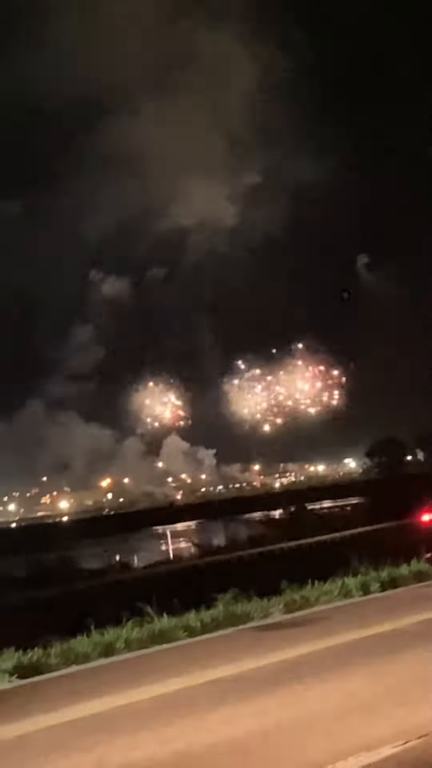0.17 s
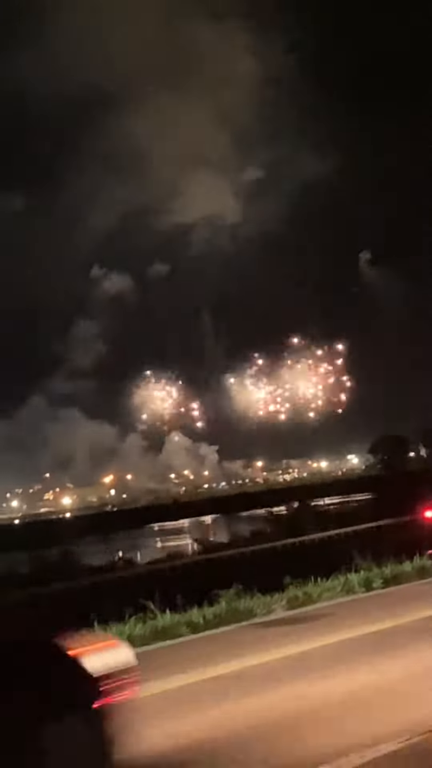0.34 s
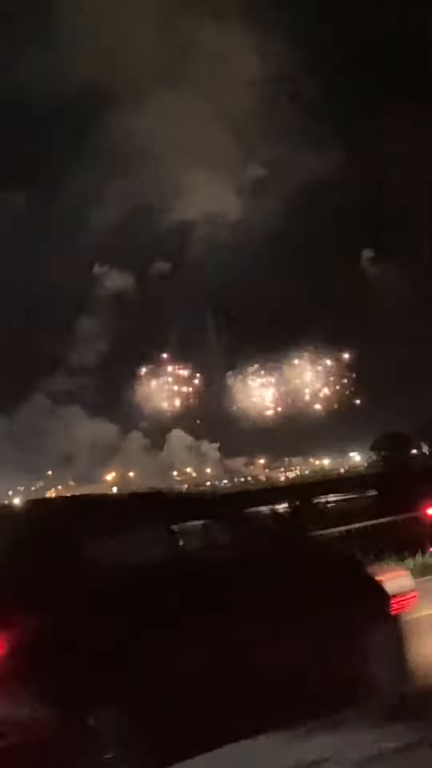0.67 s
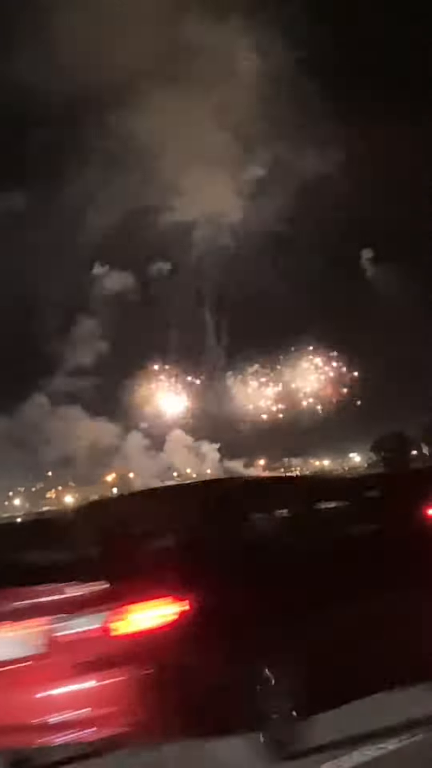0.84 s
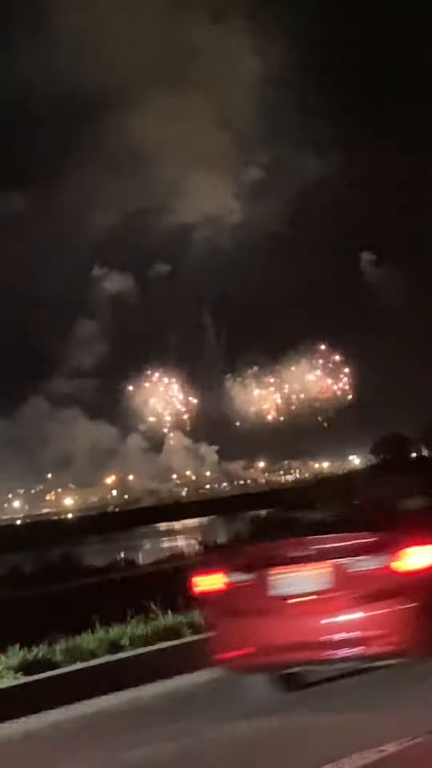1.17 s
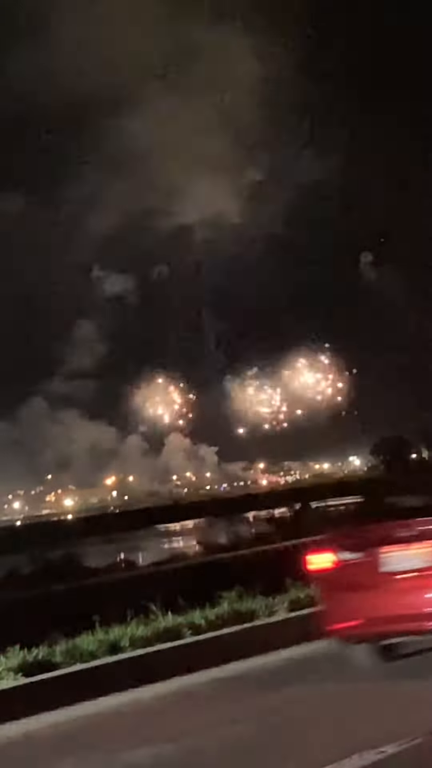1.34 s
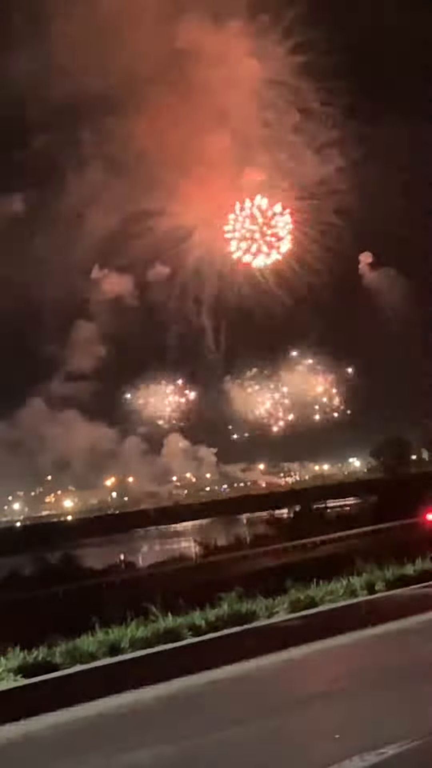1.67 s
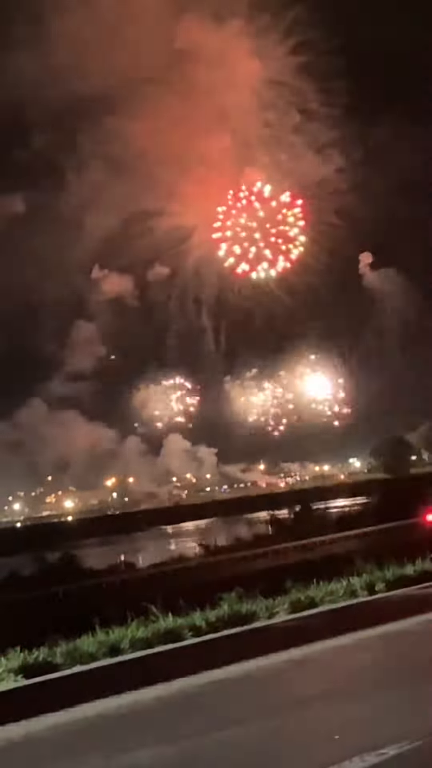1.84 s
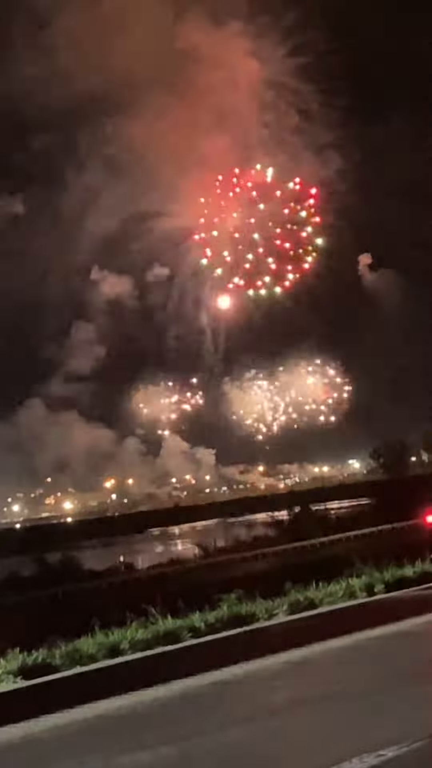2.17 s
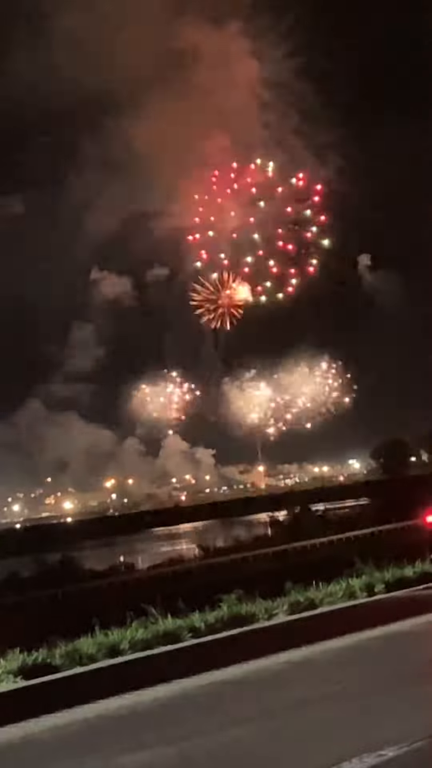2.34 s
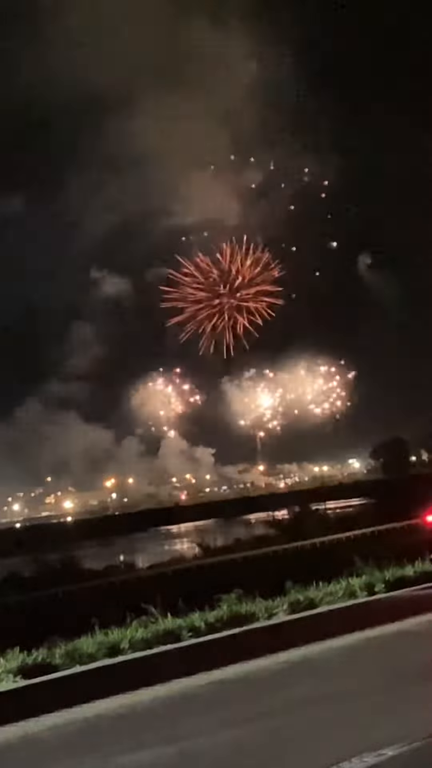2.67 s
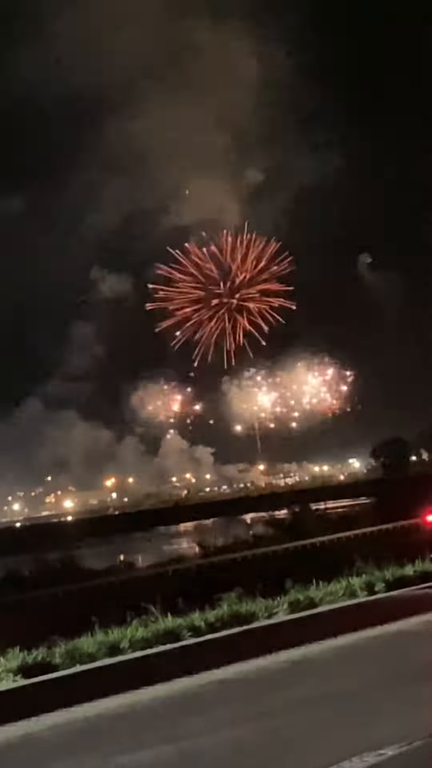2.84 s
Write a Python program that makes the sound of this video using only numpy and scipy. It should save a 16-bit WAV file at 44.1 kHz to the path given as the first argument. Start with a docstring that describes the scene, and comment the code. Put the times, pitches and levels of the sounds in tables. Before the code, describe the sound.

Fireworks bang far off across water from start to finish, about ten uneven bursts a second, each with a short echo and a quick downward bend in pitch. Small faint pops, rolling rumble and road noise run underneath. A departing car's faint tyre hiss fades over the three seconds. Stronger bangs land around 1.2 and 2.4 seconds, and a heavy shell adds a deep thump just before 2.5 seconds.

```python
"""Fireworks bursting far off over water at night, heard on a phone at a roadside.
Each burst is a sharp pulse of air that arrives twice: straight, then bounced off the water.
One heavy shell adds a deep thump, and the banks echo. Behind them are small far pops, rolling rumble,
road noise and the tyre hiss of a car drawing away. The phone lets the bass arrive late, so each
bang becomes a falling chirp, and its right microphone opening hears more than its left."""
import sys
import numpy as np
from scipy import signal
from scipy.fft import rfft, irfft, next_fast_len
from scipy.io import wavfile
from scipy.ndimage import uniform_filter1d, minimum_filter1d

SR = 44100
rng = np.random.default_rng(int(sys.argv[2]) if len(sys.argv) > 2 else 0)


def materialize(psi):
    """Save the field psi as 16-bit PCM at rate SR to the path in sys.argv[1].

    A 1-D psi becomes a single channel; in a 2-D psi each row is a channel.
    """
    bounded = np.clip(np.atleast_2d(psi).T, -1, 1)
    quanta = np.round(bounded * 32767).astype(np.int16)
    wavfile.write(sys.argv[1], SR, quanta)


N = 132300  # 3 seconds


def amp(db):
    """Turn decibels into a number to multiply by."""
    return 10 ** (np.asarray(db) / 20)


def unit_level(x):
    """Scale a signal so that its typical size (RMS) is 1."""
    return x / np.sqrt(np.mean(x ** 2) + 1e-20)


def curve_at(points, hz):
    """Read a table between its rows, on a pitch-like (log) frequency scale."""
    row_hz, value = np.transpose(points)
    return np.interp(np.log(hz + 1), np.log(row_hz + 1), value)


def add(mix, start_s, sound):
    """Mix a sound in, dropping whatever sticks out at either end."""
    at = round(start_s * SR)
    sound = sound[max(-at, 0):]
    part = mix[max(at, 0):][:len(sound)]
    part += sound[:len(part)]


# The tone of the rumble and road noise. Each row: frequency in Hz, level in dB.
RUMBLE_TONE = [(30, -75), (50, -53.5), (90, -47.5), (200, -53), (450, -54), (650, -60), (1000, -60.5),
               (1500, -64.5), (2200, -71.5), (3300, -80.5), (4700, -91.5), (6100, -104), (8000, -120)]
# How it rolls. Each row: time in seconds, then bass, middle, treble and top in dB.
# Only the rise and fall around each column's average counts.
RUMBLE_ROLL = [(0.0, -29.5, -34.5, -36.5, -56.5), (0.39, -39, -33, -38, -57), (0.56, -37, -37, -35.5, -60),
               (0.81, -34.5, -34.5, -40, -61), (1.14, -36.5, -38.5, -38, -62.5),
               (1.489, -35, -36, -36, -62), (2.21, -35.5, -39, -35.5, -63.5),
               (2.41, -35.5, -40, -35.5, -68), (2.7, -38.5, -33.5, -33.5, -62),
               (3.0, -31.5, -39, -37.5, -63.5)]
# Tyre hiss fading as a car draws away. Each row: time in seconds, level in dB.
TYRE_FADE = [(0.0, -93.5), (0.34, -99), (0.7, -100.5), (0.85, -102), (1.02, -103.5), (1.8, -107.5),
             (2.3, -111), (2.71, -113.5), (3.0, -115)]
# The tone of that hiss. Each row: frequency in Hz, boost in dB.
TYRE_TONE = [(3500, -10), (5000, 8), (6300, 8), (7300, 7), (10000, -0.8), (12500, -3.5), (14000, -5.5),
             (15500, -13)]
# How alike the noise is left and right. Each row: frequency in Hz, likeness from 0 to 1.
SIDE_LIKENESS = [(100, 1), (400, 0.8), (1000, 0.88), (2200, 0.98), (5000, 1), (7300, .98), (9000, 0.97),
                 (10500, 0.96), (14500, 0.88), (15500, .9)]


def rumble_and_road():
    """Rolling rumble, road noise and tyre hiss in stereo, built from short slices of shaped noise."""
    frames, hz = N // 256 + 5, np.fft.rfftfreq(1024, 1 / SR)
    t = np.arange(frames) * 256 / SR
    right_re, right_im, other_re, other_im, patches = rng.standard_normal((frames, 513, 5)).T
    # Patches of pitch waver by about 1.5 dB, and the whole rumble swells by about 1 dB.
    patches = uniform_filter1d(patches, size=10, axis=0)
    patch_db = 1.5 * unit_level(uniform_filter1d(patches, size=8, axis=1))
    swell_db = 1.14 * unit_level(uniform_filter1d(rng.standard_normal(frames), size=6))
    times, *bands = np.transpose(RUMBLE_ROLL)
    roll_db = np.array([np.interp(t, times, band - band.mean()) for band in bands])
    band_hz = (110, 450, 1500, 5300)  # bass, middle, treble, top
    blend = np.array([curve_at(list(zip(band_hz, one_band)), hz) for one_band in np.eye(4)])
    rumble = amp(curve_at(RUMBLE_TONE, hz)[:, None] + blend.T @ roll_db + patch_db + swell_db)
    hiss = amp(curve_at(TYRE_TONE, hz)[:, None] + np.interp(t, *np.transpose(TYRE_FADE)))
    alike = curve_at(SIDE_LIKENESS, hz)[:, None]
    right = right_re + 1j * right_im
    left = alike * right + np.sqrt(1 - alike ** 2) * (other_re + 1j * other_im)
    slices = np.array([left, right]) * np.hypot(rumble, hiss)
    return 6.72 * signal.istft(slices, nperseg=1024, noverlap=768)[1][:, :N]


# The tone of one bang. Each row: frequency in Hz, relative level in dB.
BANG_TONE = [(25, -40.5), (45, -14), (90, -6.5), (130, -4), (300, 2.5), (450, 0), (600, -5.5), (750, -15),
             (1000, -11.5), (1500, -22), (2200, -30.5), (3300, -36.5), (4700, -49), (6000, -59),
             (7500, -57), (10000, -82.5), (13000, -83.5), (15500, -94)]
# Five tone controls for a bang. Each row: frequency in Hz, share of the boost from 0 to 1.
KNOCK_BAND = [(550, 0), (850, 1), (1250, 1), (1800, 0)]  # around 1000 Hz
TREBLE_BAND = [(1250, 0), (1800, 1)]  # from about 1500 Hz up
BOOM_BAND = [(170, 1), (260, 0)]  # the bass
HOLLOW_BAND = [(550, 0), (750, 1), (950, 0)]  # around 750 Hz
SNAP_BAND = [(2400, 0), (3800, 1)]  # from about 3000 Hz up
BANG_LEAD = 2048  # samples that come before the pulse itself
SMEAR_DB, SMEAR_HZ, SMEAR_FADE_MS = -6, 930, 1.66


def bang(db, knock_db=0, treble_db=0, boom_db=0, hollow_db=0, snap_db=0, low_cut_hz=0.75):
    """One pulse of air pressure. Rough air and ground smear it, the treble most."""
    size = 2 * BANG_LEAD
    hz, t = np.fft.rfftfreq(size, 1 / SR), np.arange(size) / SR
    tone = amp(curve_at(BANG_TONE, hz))
    controls = [(knock_db, KNOCK_BAND), (treble_db, TREBLE_BAND), (boom_db, BOOM_BAND),
                (hollow_db, HOLLOW_BAND), (snap_db, SNAP_BAND)]
    boost = amp(sum(boost_db * curve_at(band, hz) for boost_db, band in controls))
    smear = rng.standard_normal(size) * np.exp(-1000 * t / SMEAR_FADE_MS) * (t > 0)
    share = amp(SMEAR_DB) * np.minimum(hz / SMEAR_HZ, 3)
    rough_path = (1 + share * rfft(smear / np.linalg.norm(smear))) / np.sqrt(1 + share ** 2)
    steep_front = np.exp(-0.5j)  # shifting every wave by half a radian steepens the front
    low_cut = 1 / (1 + (low_cut_hz / (hz + 1)) ** 4)
    pulse = irfft(tone * boost * rough_path * steep_front * low_cut)
    plain_peak = irfft(tone)[0]
    return amp(db + 2) * np.roll(pulse, BANG_LEAD) / plain_peak  # every bang is lifted by 2 dB


def far_pops(per_second=130, quietest_db=-34.5):
    """Small far bangs at random moments, most of them faint."""
    extra_db = 6 * np.minimum(rng.exponential(1, N), 3)
    hits = amp(quietest_db + extra_db) * (rng.random(N) < per_second / SR)
    return signal.oaconvolve(hits, bang(0))[BANG_LEAD:N + BANG_LEAD]


def bank_echoes(shells, level_db=-17.5, fade_s=0.09):
    """Echoes off the banks: three thin, dying trails of reflections take turns."""
    t, out = np.arange(SR // 4) / SR, 0
    cycle = 2 * np.pi * 3 * np.arange(N) / SR
    for k in range(3):
        reflections = rng.standard_normal(len(t)) * (rng.random(len(t)) < 1500 / SR)
        trail = reflections * amp(-60 * t / fade_s) * (t > .004)
        turn = np.sqrt(2 / 3) * np.cos(cycle + k * np.pi / 3)
        out = out + signal.oaconvolve(shells * turn, trail / np.linalg.norm(trail))[:N]
    return amp(level_db) * out


# The heavy shell's cracks. Each row: start in seconds, then relative level, knock and treble in dB.
HEAVY_CRACKS = [(2.4512, -2, -4, -22), (2.4561, 4.5, -3.5, -8.5)]
THUMP_START_S, THUMP_HZ, THUMP_DB, THUMP_RISE_S, THUMP_FADE_S = 2.4387, 80, -2.5, .018, .06


def heavy_shell():
    """Two thin cracks on top of a deep swing of air that quickly dies away."""
    out, t = np.zeros(N), np.arange(0, .2, 1 / SR)
    for start_s, db, knock_db, treble_db in HEAVY_CRACKS:
        add(out, start_s - BANG_LEAD / SR, bang(db, knock_db, treble_db, low_cut_hz=337))
    rise = np.sin(np.pi / 2 * np.minimum(t / THUMP_RISE_S, 1)) ** 2
    fade = amp(-60 * np.maximum(t - THUMP_RISE_S, 0) / THUMP_FADE_S)
    swing = np.cos(2 * np.pi * THUMP_HZ * (t - THUMP_RISE_S))
    add(out, THUMP_START_S, amp(THUMP_DB) * rise * fade * swing)
    return out


# The bursting shells. Each row: start in seconds, then relative level, knock and treble in dB;
# the bounce's delay in milliseconds, its level against the straight sound, its knock and treble in dB;
# and last, boom, hollow and snap in dB, which both arrivals share.
SHELL_BURSTS = [(0.0164, 1.5, -14, 0.5, 6.87, 1.5, 3, 4, -1.5, 4, 1.3),
                (0.1736, 2.5, 2, 2, 7.06, 1, 1, -8, 0.3, -2.5, 1.5),
                (0.2094, -1.5, 7, 15.5, 7.6, 5.5, -1.5, 1, -2, -2.5, 4),
                (0.281, 4.5, 0.5, 5, 7.2, -5, -3, 6, -0.6, -5.3, 0.3),
                (0.371, -3, -3, -13, 7.6, 6, 5.5, 2.5, 2.2, 3.5, -2.5),
                (0.4665, 0.5, 5, -1, 7.24, -1.5, 4.5, -2, 2.5, -4, 7),
                (0.5499, 2, 4, 5.5, 7.1, -2.5, 0, 0.5, 3, -1, 5),
                (0.7418, 1, 5, 1.5, 9.2, -28, 0, 13, 5, 2, -2),
                (0.7461, -8, 2.5, 7, 7.7, 8.5, 7.5, 3, 4.5, 13, 3.5),
                (0.813, 6, 9, 13, 7.6, -7, -9.5, -2.5, 2, 8.5, 3),
                (0.9122, -3, 9, 0.5, 7.5, 0, 2, -4.5, 6.5, -0.3, 0.1),
                (0.9355, 1, 4, 2.5, 7, 4, 3, -2.5, 4, 5, 6.5),
                (0.9822, -3.5, -1.5, 5.5, 7.8, 12, 2.5, -10, -0.9, 0.5, 5),
                (1.195, 2, 7.5, 2, 7.6, -2.5, 0, 1, -2, -2.2, 4.5),
                (1.2051, 9.5, -1, -8.5, 7.4, -12, -7, -5.5, -1.5, 2.2, 1),
                (1.3297, 4, 2, 2, 7.5, 1.5, -12, -5.5, 0.3, -5.5, 1.3),
                (1.3769, 3, 10.5, 6, 8.5, 1.5, -4, 0.5, -3.2, -2, -5),
                (1.526, 4, -10.5, 5.5, 7.14, 0.5, 7, 3.5, 1, 5, 1),
                (1.622, -3, 1, 5, 7.4, 8.5, 1, -1.5, -2.7, -0.3, 1.5),
                (1.6437, 2.5, -5.5, -3.5, 6.8, -4.5, -1.5, -6, 0.7, -5.5, 1),
                (1.7171, 3.5, 2.5, -2, 6.7, -2.5, -1.5, -3, -2.5, -4.7, 6),
                (1.8339, 3.5, 4, -2, 6.6, -2, -5, -2.5, 0, -9.5, -0.5),
                (1.984, 3, 0, 4, 7.7, -11, 5, 1, 1.7, -2, -6),
                (1.9996, 1.5, 4, 1.5, 7.15, 2, -12.5, -4, 0.1, -5.5, 0.5),
                (2.1078, 4, 2, 3.5, 8.7, 2.5, -11.5, 8, -4.2, -8.5, -4.5),
                (2.2544, 3.5, 0, 3.5, 7.56, 1, -6, -1, -2.9, -1, -6),
                (2.36, 2, 4, -0.5, 6.4, -6, -17.5, -7, -6.8, -1.7, 0),
                (2.367, 7, -11.5, -0.5, 6.67, -0.5, 4.5, 3.5, 0.5, 4.5, 0),
                (2.5483, 5, 3.5, 1, 8.9, -4, -4.5, -2, 2.5, -3, 2.5),
                (2.6955, 2, -10, 5, 7, 5.5, 3, 3.5, 0.1, 4.5, 0),
                (2.8659, 3, -4.5, 2.5, 8.6, 4.5, -25, -1.5, -1.3, -3.5, -2),
                (2.879, -3, -1.5, -3.5, 5.8, 2, 2, -9, 0.5, 1, -1)]


def firework_bursts():
    """Each shell's bang arrives once straight and a moment later off the water."""
    out = np.zeros(N)
    for row in SHELL_BURSTS:
        start_s, db, knock, treble, delay_ms, bounce_db, bounce_knock, bounce_treble, *shared = row
        at_s = start_s - BANG_LEAD / SR
        add(out, at_s, bang(db, knock, treble, *shared))
        add(out, at_s + delay_ms / 1000, bang(db + bounce_db, bounce_knock, bounce_treble, *shared))
    return out


def scene():
    """The fireworks and their echoes over the far pops and the roadside noise."""
    shells = firework_bursts() + heavy_shell()
    return shells + bank_echoes(shells) + far_pops() + rumble_and_road()


# How loud the phone's left opening is against its right. Each row: frequency in Hz, level in dB.
LEFT_LEVEL = [(45, -.5), (85, -1.3), (150, -4), (215, -8.5), (280, -13), (345, -17), (390, -17),
              (470, -11.5), (540, -9), (700, -7.5), (1000, -7.5), (1410, -7.5), (1720, -4), (2000, 0),
              (6000, 0)]
# How far the left side's waves run ahead. Each row: frequency in Hz, lead in radians.
LEFT_LEAD = [(0, 0), (215, -.5), (280, -.8), (345, -1.3), (430, -2.5), (540, -3.6), (775, -4.3),
             (1000, -4.4), (1380, -5.4), (1660, -7), (1900, -6.4), (2500, -5.6), (3270, -6.2), (4100, -5.9),
             (4480, -5.6), (4900, -6.1), (5500, -5.7), (6600, -3.6), (7100, -3.14), (8100, -3.14),
             (9600, 0), (11600, 0), (12500, 3.14), (14700, 3.14), (15400, 6.28)]
LOW_CUT_HZ, HIGH_CUT_HZ, PEAK_LIMIT = 39, 15900, .93


def record(dry):
    """The phone delays the bass, favours the right, turns peaks down and cuts the extreme lows and highs."""
    size = next_fast_len(N + 8192)
    hz = np.fft.rfftfreq(size, 1 / SR)
    left = amp(curve_at(LEFT_LEVEL, hz)) * np.exp(1j * np.interp(hz, *np.transpose(LEFT_LEAD)))
    openings = np.array([left, np.ones(len(hz))])
    low_cut = 1 / np.sqrt(1 + (LOW_CUT_HZ / (hz + 1)) ** 6)
    delay_s = .0048 * 300 / np.maximum(hz, 38)  # 4.8 ms at 300 Hz, twice that an octave lower
    late_bass = np.exp(-2j * np.pi * np.cumsum(delay_s) * hz[1])
    heard = irfft(rfft(dry, size) * openings * low_cut * late_bass, size)[:, :N]
    safe_gain = np.minimum(PEAK_LIMIT / (abs(heard).max(0) + 1e-9), 1)
    limited = heard * uniform_filter1d(minimum_filter1d(safe_gain, size=61), size=61)
    high_cut = signal.firwin(511, HIGH_CUT_HZ, window=("kaiser", 9), fs=SR)
    return signal.oaconvolve(limited, high_cut[None], "same")


dry = scene()
out = record(dry)
materialize(out)
```